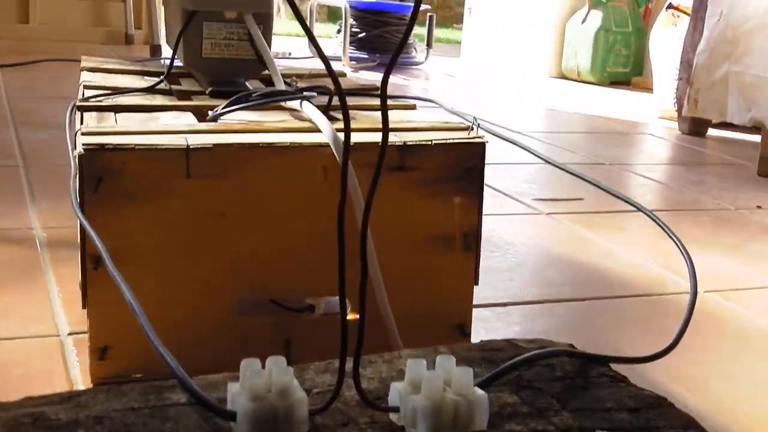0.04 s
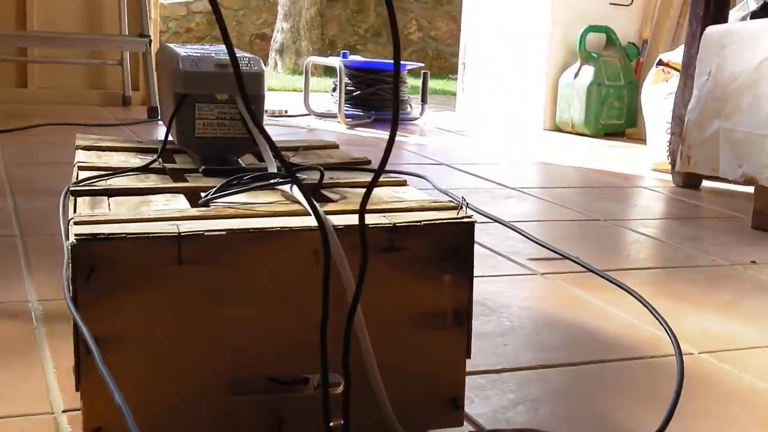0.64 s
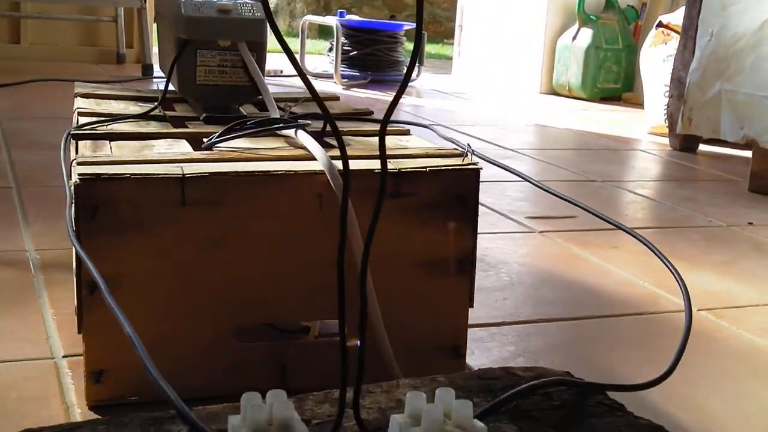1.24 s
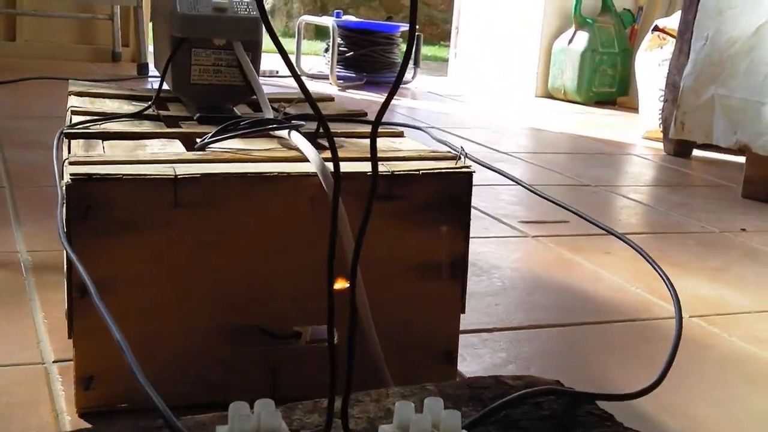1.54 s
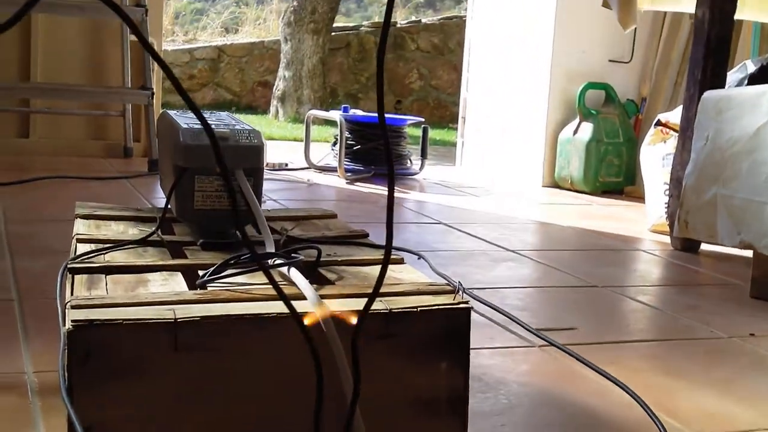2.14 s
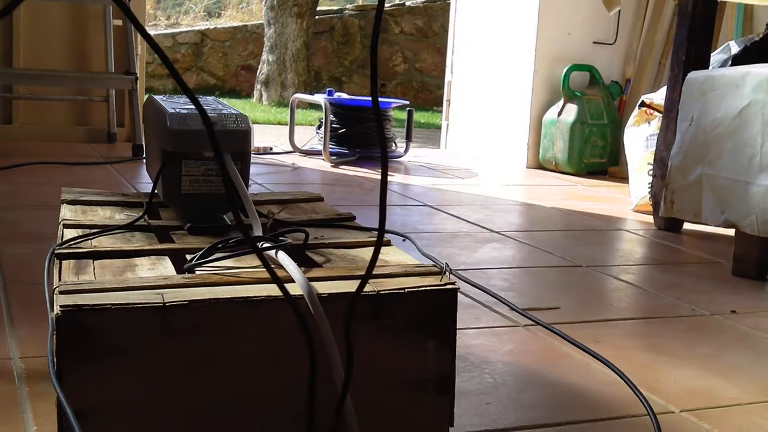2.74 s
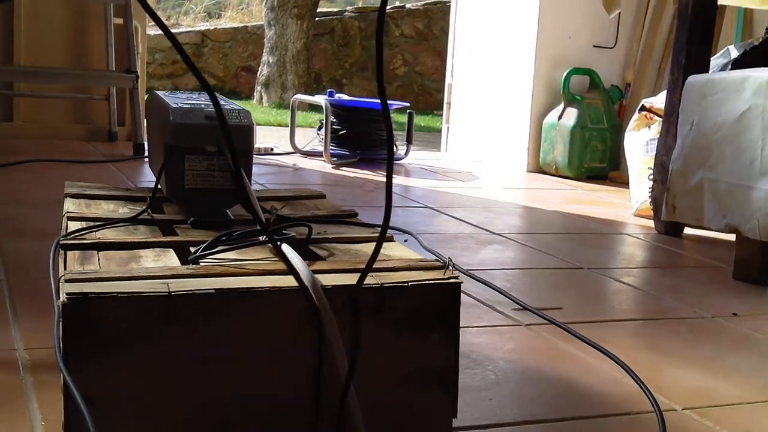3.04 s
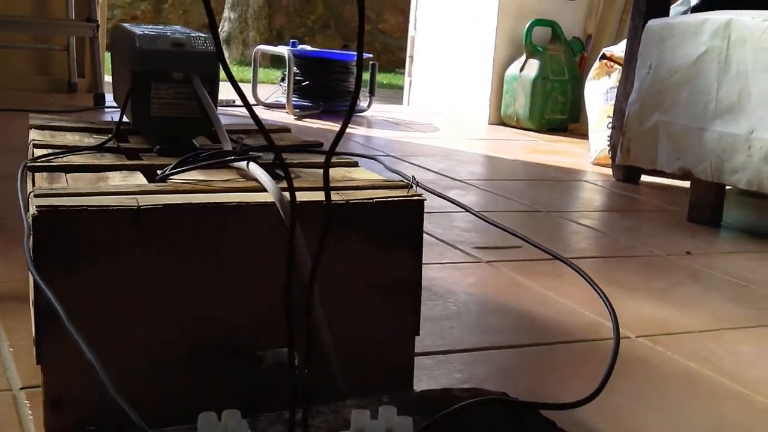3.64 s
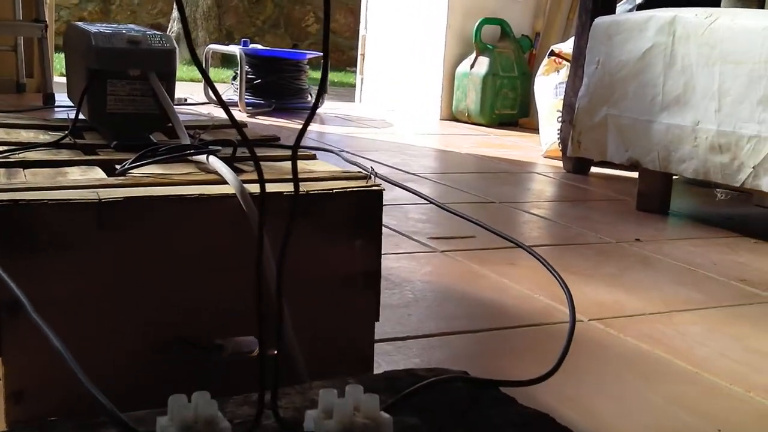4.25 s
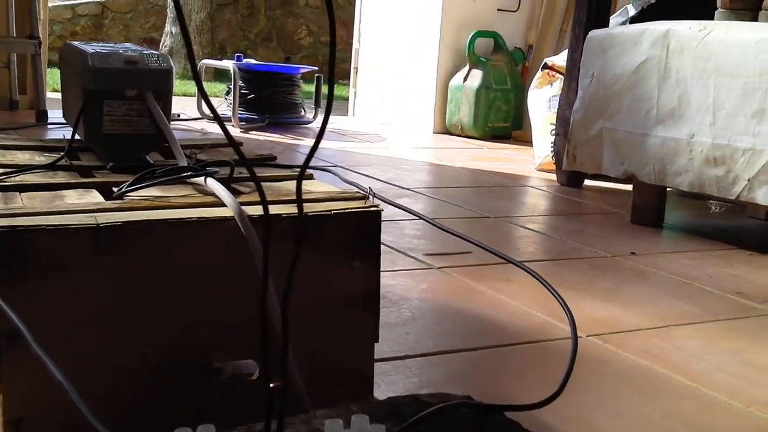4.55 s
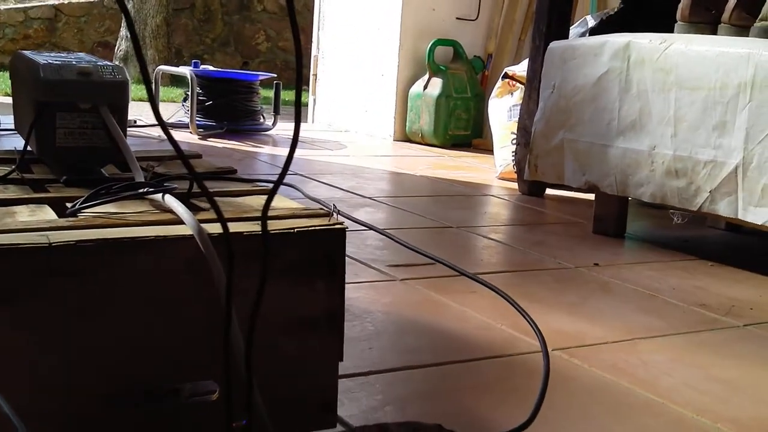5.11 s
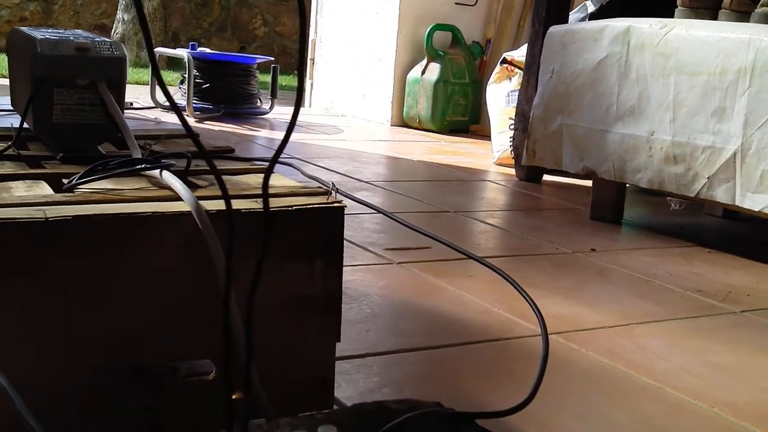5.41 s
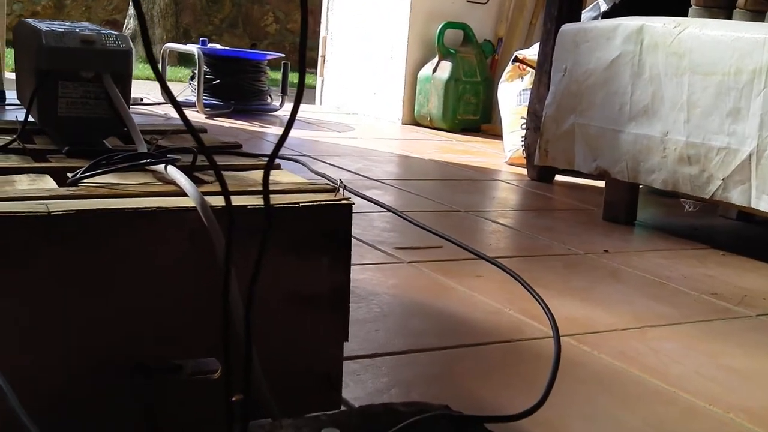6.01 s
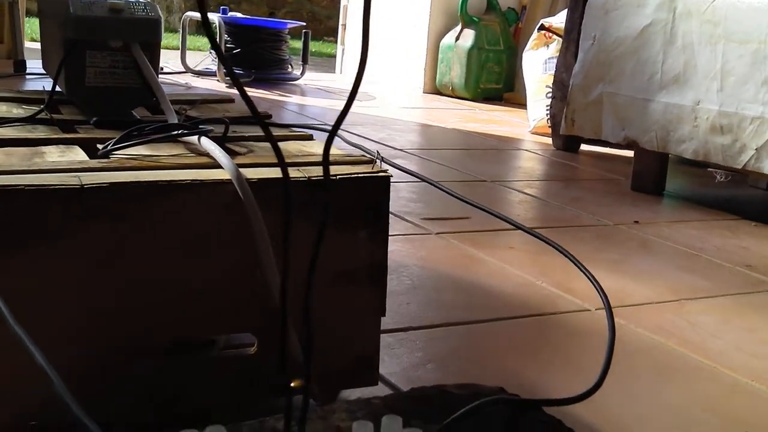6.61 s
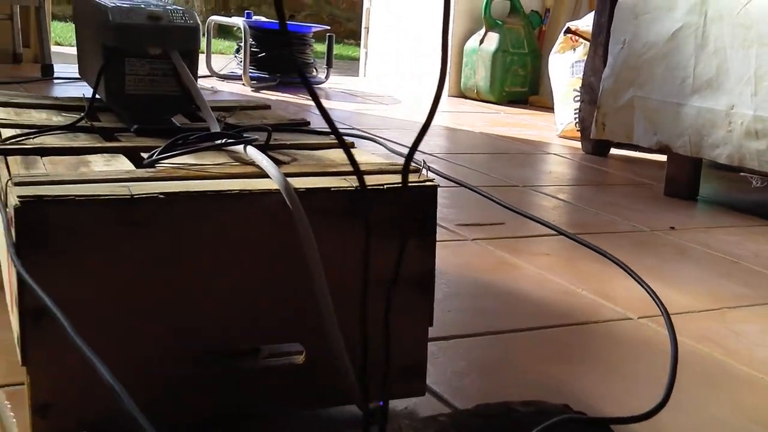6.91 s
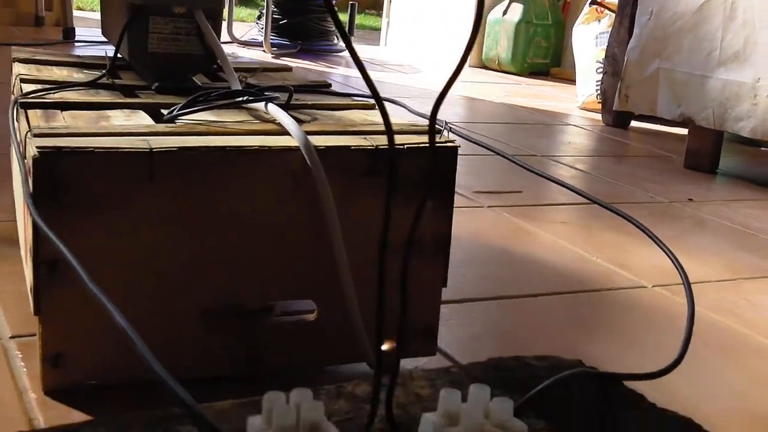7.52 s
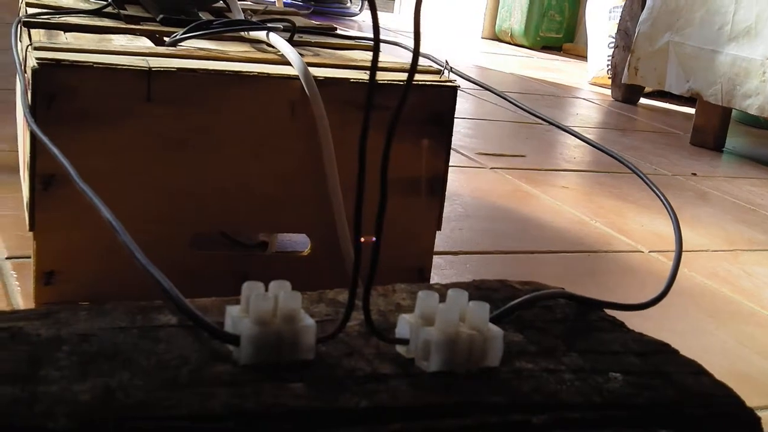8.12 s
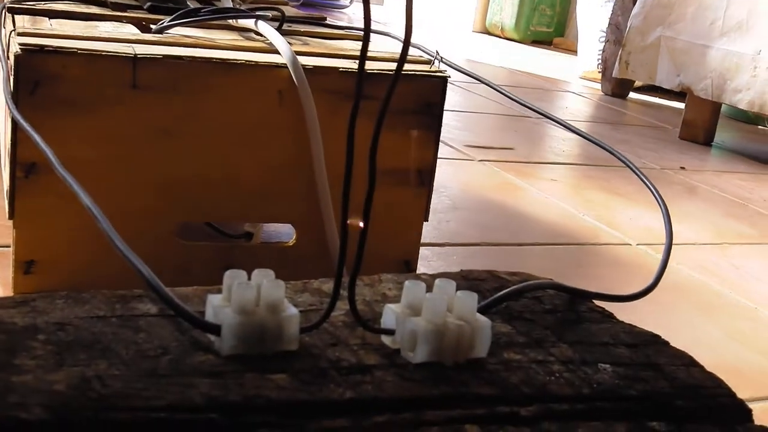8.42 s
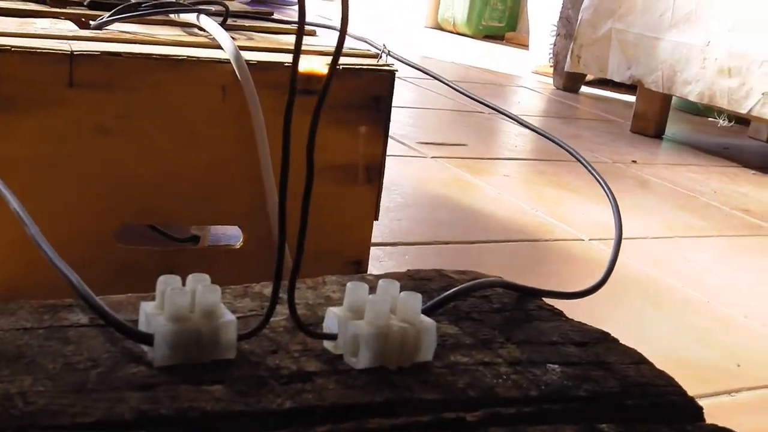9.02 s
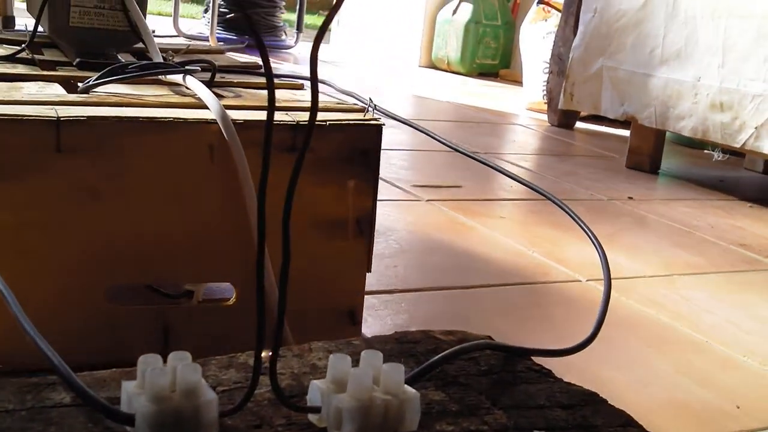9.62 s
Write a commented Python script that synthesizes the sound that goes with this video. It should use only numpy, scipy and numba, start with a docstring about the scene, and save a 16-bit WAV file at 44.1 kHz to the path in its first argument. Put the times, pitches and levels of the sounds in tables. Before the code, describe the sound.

Close electric buzzing and crackling in a room, growing louder and deeper twice as an arc rises along wires and cuts out.

```python
"""A climbing arc between two diverging wires, fed by a mains transformer in a tiled room.
First a short spark buzzes and spits in the narrow gap, striking with a snap in every mains half cycle.
At 1.3 s it lifts off, sizzles and grows louder and deeper as it stretches; at 2.5 s it breaks.
The buzz starts again below, with three soft bumps between 3.5 and 7 s.
From 8.4 to 9.5 s a second arc climbs and breaks, and the spark returns to the gap."""
import sys
import numpy as np
from scipy import signal
from scipy.fft import rfft, irfft
from scipy.io import wavfile
from scipy.ndimage import map_coordinates
from numba import njit

SR = 44100
rng = np.random.default_rng(int(sys.argv[2]) if len(sys.argv) > 2 else 0)


def generate_wav(signal):
    """Clip the signal to [-1, 1] and save it as 16-bit WAV at the path in sys.argv[1]."""
    frames = np.transpose(np.atleast_2d(signal))
    scaled = np.clip(frames, -1, 1) * 32767
    pcm = np.round(scaled).astype(np.int16)
    wavfile.write(sys.argv[1], SR, pcm)


N = 434826
TIME_S = np.arange(N) / SR
MAINS_HZ = 50

# Spectra. Each row: frequency in Hz, relative level in dB.
AMBIENCE_SPECTRUM = [(20, -16), (60, -13.5), (125, -26), (165, -19.5), (200, -15), (300, -9.5), (400, -0.5),
                     (520, -9), (800, -9), (1700, -19), (4000, -6), (9000, -22.5), (15500, -9)]
ROOM_MID_SPECTRUM = [(100, -14), (400, -8), (800, -3.5), (1800, -3.5), (4000, -2.5), (8000, -10),
                     (15500, -5)]  # reflections alike in both ears
ROOM_SIDE_SPECTRUM = [(100, -1), (400, -23), (1200, -13), (2500, -19), (4000, -4.5), (8000, -6),
                      (15500, -4)]  # reflections opposed in the two ears
SPIT_SPECTRUM = [(800, -5.5), (2200, -7), (4300, 2), (5500, 7), (7200, 16.5), (9500, 12), (12000, -3),
                 (15500, 4)]
POP_SPECTRUM = [(150, -24), (400, -1.5), (800, 3), (1300, -1.5), (2000, 0), (3500, 0.5), (8000, -28)]
SIZZLE_SPECTRUM = [(40, -16), (130, -21), (300, -6), (600, 1.5), (1300, -0.5), (1900, 0), (2800, -2),
                   (3600, -.5), (4600, 1.5), (6000, -4.5), (7300, 4.5), (9500, -1), (12000, -7.5),
                   (15500, -17)]
SHORT_THUMP_SPECTRUM = [(60, -48), (150, -32), (200, -13.5), (250, -3), (420, 2), (500, -3.5), (610, 3),
                        (720, -2.5), (950, -3.5), (1050, -8.5), (1150, -6.5), (1350, -5.5), (1500, -18),
                        (2200, -23.5)]
LONG_THUMP_SPECTRUM = [(40, -22), (120, -26.5), (200, -14), (300, -4.5), (400, 1), (500, -0.5), (600, 1.5),
                       (700, -5), (800, -2), (1150, -15), (2200, -19.5)]
SHORT_SNAP_SPECTRUM = [(200, -27), (900, -37), (1350, -9.5), (1800, -11), (2400, -8.5), (3200, -7),
                       (3750, -4), (4400, -14), (5700, -6), (7200, 2.5), (9300, 5.5), (11500, -5.5),
                       (13000, -0.5), (15500, -2.5)]
LONG_SNAP_SPECTRUM = [(900, -56), (1800, -11), (3500, -7), (4600, 1.5), (7000, 3), (9300, 7), (11000, 3.5),
                      (13000, 2.5), (15500, -6)]
BREAKING_SNAP_SPECTRUM = [(900, -27), (1800, -8.5), (3500, -19), (5000, -6), (7200, 2.5), (9500, 7.5),
                          (11000, 1), (13000, -4), (15500, -16)]

# Ringing modes. Each row: frequency in Hz, relative level in dB, T60 in seconds.
ROOM_RESONANCES = [(401, -8.5, 0.74), (456, 5.5, 0.21), (501.6, -1, 1.0), (600, -2.5, 0.53)]
BUMP_RESONANCES = [(163, -12, 0.04), (254, -5, 0.047), (350, 1.5, 0.034), (458, 0.5, 0.031)]
WIRE_RESONANCES = [(3700, -67, 0.046), (3840, -70, 0.057), (4200, -62.5, 0.067)]
# Microphone dips. Each row: frequency in Hz, width in Hz, depth from 0 to 1.
MIC_NOTCHES = [(7865, 690, 1), (11700, 97, 1)]
# Echo off the base under the wires, later as the arc rises. Each row: time in seconds, lag in ms.
BASE_LAG_MS = [(1.33, .152), (1.42, .179), (1.56, .218), (1.63, .252), (1.77, .346), (1.84, .383),
               (1.98, .42), (2.26, .471), (2.46, .49), (8.42, .145), (8.5, .15), (8.66, .201), (8.9, .238),
               (9.06, .266), (9.14, .298), (9.38, .368), (9.49, .38)]
# Floor echo, shifting as the microphone moves. Each row: time in seconds, lag after the base echo in ms.
FLOOR_LAG_MS = [(0, 0.62), (1.55, 0.65), (1.85, 0.73), (2.3, 0.69), (3.8, 0.53), (6, 0.67), (7.3, 0.676),
                (8.3, 0.64), (9.4, 0.71)]

# Soft bumps. Each row: start in seconds, relative level in dB.
BUMP_EVENTS = [(3.452, -26), (6.325, -37), (7.044, -24)]
# Spits at the arc's feet. Each row: peak time in seconds, relative crackle and pop levels in dB.
SPIT_EVENTS = [(0.0794, -20, -31), (0.0977, -21, -36), (0.1158, -23, -36), (0.179, -27, -36),
               (0.1892, -21, -40), (0.1965, -19.5, -32), (0.4253, -29, -38), (1.1472, -25, -52),
               (1.168, -21, -39), (1.2388, -21, -47), (1.285, -25, -37), (1.2983, -23, -33),
               (1.3394, -20, -45), (1.58, -22, -32), (1.656, -22, -26.5), (1.739, -28, -24),
               (1.787, -24, -23.5), (1.836, -29, -23), (1.8968, -32, -19.5), (2.088, -11, -25),
               (2.392, -26, -28), (2.9078, -30, -33), (2.9375, -30, -35), (2.9379, -24, -33),
               (2.966, -25, -36), (3.2361, -34, -37), (5.719, -27, -42), (5.7296, -24, -28.5),
               (6.9673, -32, -45), (7.0874, -27, -43), (8.0066, -29, -36.5), (8.207, -24, -39),
               (8.4506, -25, -32), (8.469, -24, -38), (8.4989, -15, -49), (8.5101, -16.5, -36),
               (8.62, -20, -29), (8.6574, -20, -30), (8.6777, -16, -32), (8.681, -13.5, -25.5),
               (8.739, -21, -28), (8.7483, -27, -25), (8.757, -22, -28.5), (8.79, -22, -27.5),
               (8.85, -25, -22), (8.879, -19, -24), (8.999, -17.5, -25.5), (9.257, -36, -22),
               (9.28, -41, -20), (9.301, -33, -22), (9.438, -19, -21), (9.8293, -25, -30),
               (9.841, -27.5, -33)]
# Strikes that stand out. Each row: time in seconds, relative level in dB, loss per next strike in dB.
CRACK_EVENTS = [(1.803, -24, 5), (1.833, -28.5, 0), (1.863, -25, 8), (1.903, -23, 4), (2.203, -21, 1.5),
                (2.233, -24.5, 14), (2.283, -25, 16), (2.303, -21, 0.5), (2.443, -19, 9), (7.724, -39, 12),
                (8.424, -34.5, 12), (8.724, -31.5, 14), (9.094, -27.5, 11), (9.134, -25, 12),
                (9.154, -24.5, 3), (9.194, -26, 4), (9.234, -25.5, 4), (9.284, -27, 18), (9.304, -33, 16),
                (9.324, -26, 14), (9.364, -24, 10), (9.384, -28.5, 11), (9.404, -25, 12), (9.434, -22, 4),
                (9.474, -21.5, 7)]
# Mains drift. Each row: time in seconds, mean strike lag into the half cycle in ms.
STRIKE_LAG_MS = [(0, 2.48), (3, 3.48), (4.5, 4.02), (6, 4.29), (9.85, 4.7)]
# Colour of the buzz. Each row: time in seconds, gain around 900 Hz in dB.
BUZZ_MID_DB = [(0, 0), (1, 0.5), (2.8, 0.5), (3.4, 2), (4.1, 0), (5.1, 1), (6, 1.5), (6.6, 1.5), (7.3, 2),
               (8.3, 1.5), (9.8, 1)]
# Short spark in the gap. Each row: time in seconds, relative snap, thump and sizzle levels in dB,
# snap gain around 6 kHz in dB, snap gain above 12 kHz in dB.
GAP_LEVELS_DB = [(0, -39.5, -49.5, -40.5, -5.5, -1.5), (.6, -44.5, -49.5, -48, 0.5, 4),
                 (1.25, -40.5, -49, -41.5, -3, 2), (2.65, -44.5, -51.5, -44, -7, -5),
                 (3.2, -43, -51.5, -43, -0.5, 4), (3.9, -40.5, -51, -46, -12, -0.5),
                 (5.8, -44.5, -50.5, -44.5, -2, 4), (6.85, -44, -49.5, -44, 1, 5.5),
                 (7.03, -46, -49.5, -43, 1.5, 5), (7.11, -49.5, -49, -41, 9.5, 11),
                 (7.17, -45, -49, -50, 0.5, 5), (7.35, -44.5, -49, -45.5, 0.5, 5),
                 (8.4, -40, -48.5, -42.5, -3.5, 4.5), (9.6, -41.5, -49, -38.5, -22, -8)]
# Climbs. Each row: lift-off in seconds, break in seconds, snap offset in dB, thump offset in dB.
CLIMB_EVENTS = [(1.264, 2.451, -1, -0.5), (8.436, 9.493, 0.5, -1.5)]
# Course of every climb. Each row: progress from 0 to 1, relative snap and thump levels in dB.
CLIMB_LEVELS_DB = [(.05, -38, -47), (.24, -35.5, -45), (.31, -32.5, -43.5), (.6, -29.5, -40),
                   (.76, -24, -33.5), (.88, -29.5, -30.5), (1, -24.5, -26.5)]
# Sizzle of the climbs. Each row: time in seconds, relative level in dB, band centre in Hz.
SIZZLE_TRACK = [(1.29, -29, 6400), (1.36, -30, 6100), (1.43, -29, 5640), (1.54, -35, 5250),
                (1.63, -24, 4740), (1.72, -26, 4020), (1.82, -29.5, 3400), (1.91, -27, 3200),
                (2.0, -23.5, 4600), (2.09, -28, 4600), (2.22, -27.5, 2500), (2.29, -38, 1990),
                (2.45, -39, 1800), (8.46, -47, 6600), (8.5, -30.5, 6400), (8.54, -29, 5900),
                (8.61, -27, 5400), (8.645, -31.5, 5000), (8.715, -34, 4600), (8.75, -25.5, 4400),
                (8.83, -26.5, 4200), (9.02, -26.5, 4000), (9.12, -23, 3600), (9.2, -26, 2700),
                (9.28, -30.5, 1900), (9.35, -33.5, 1700), (9.49, -30, 1700)]


def from_db(db):
    """Decibels to gain."""
    return 10 ** (np.asarray(db) / 20)


def unit_rms(x):
    """Scale to an rms of 1."""
    return x / np.sqrt(np.mean(x ** 2) + 1e-20)


def curve(rows, at):
    """Interpolate a table's columns along its first."""
    knots, *columns = np.transpose(rows)
    return [np.interp(at, knots, column) for column in columns]


def response(spectrum, size=4096):
    """Minimum-phase impulse response of a spectrum."""
    hz, db = np.transpose(spectrum)
    grid_hz = np.maximum(np.fft.rfftfreq(size, 1 / SR), 1)
    gain = from_db(np.interp(np.log(grid_hz), np.log(hz), db))
    cepstrum = irfft(np.log(gain))
    cepstrum[1:size // 2] *= 2
    cepstrum[size // 2 + 1:] = 0
    return irfft(np.exp(rfft(cepstrum)))


def colour(x, spectrum):
    """Filter by a spectrum, keeping the power of a white input."""
    impulse = response(spectrum)
    return signal.oaconvolve(x, impulse / np.linalg.norm(impulse))[:N]


def butter(x, hz, kind="low", order=1):
    """Butterworth filter."""
    return signal.sosfilt(signal.butter(order, hz, kind, fs=SR, output="sos"), x)


@njit
def gliding_band(x, centre_hz, damping=1.0):
    """Unity-gain resonance with a moving centre."""
    out, band_state, low_state = np.zeros(len(x)), 0.0, 0.0
    for i in range(len(x)):
        g = np.tan(np.pi * centre_hz[i] / SR)
        band = (band_state + g * (x[i] - low_state)) / (1 + g * (g + damping))
        band_state = 2 * band - band_state
        low_state += 2 * g * band
        out[i] = damping * band
    return out


def delayed(x, delay_ms):
    """Time-varying delay."""
    return map_coordinates(x, [np.arange(N) - delay_ms * SR / 1000], order=3)


def clicks(times_s, sizes):
    """One impulse at each time."""
    samples = np.clip(np.round(times_s * SR).astype(int), 0, N)
    return np.bincount(samples, sizes, N + 1)[:N]


def capped_normal(count, cap=1):
    """Gaussian draws, limited from above."""
    return np.minimum(rng.standard_normal(count), cap)


def climb_at(times_s, lift_s=0.034):
    """Progress of the climb and how fully the arc has left the gap, both 0-1."""
    progress = lifted = 0
    for start_s, end_s, *_ in CLIMB_EVENTS:
        unbroken = times_s < end_s
        progress += unbroken * np.clip((times_s - start_s) / (end_s - start_s), 0, 1)
        lifted += unbroken * np.clip((times_s - start_s) / lift_s, 0, 1)
    return progress, lifted


def height_at(times_s, rest=0.06, jump=0.15):
    """Arc height, 0-1: a jump at lift-off, then an accelerating rise."""
    progress, lifted = climb_at(times_s)
    return np.clip(rest + jump * lifted + (1 - rest - jump) * progress ** 1.3, 0, 1)


def levels_db_at(times_s):
    """Snap, thump and sizzle levels, blended from gap to climb."""
    progress, lifted = climb_at(times_s)
    snap_db, thump_db = curve(CLIMB_LEVELS_DB, progress)
    for start_s, end_s, snap_offset_db, thump_offset_db in CLIMB_EVENTS:
        during = (times_s > start_s) & (times_s < end_s)
        snap_db += during * snap_offset_db
        thump_db += during * thump_offset_db
    climb_db = snap_db, thump_db, curve(SIZZLE_TRACK, times_s)[0]
    return [gap + lifted * (climb - gap) for gap, climb in zip(curve(GAP_LEVELS_DB, times_s), climb_db)]


def ambience(level_db=-48.5, side_db=-5.0, rumble_db=-82.0):
    """Steady rush of the room, with a faint separate rumble in each ear."""
    mid, side = (colour(rng.standard_normal(N), AMBIENCE_SPECTRUM) for _ in range(2))
    rush = mid + from_db(side_db) * np.array([side, -side])
    rumble = unit_rms(butter(rng.standard_normal((2, N)), 90, order=2))
    return from_db(level_db) * rush + from_db(rumble_db) * rumble


def reflections(x, spectrum, early_share, t60_s, early_decay_s=0.0022, first_s=0.00034):
    """Close reflections from crate and floor, then the diffuse tail, at one spot."""
    t = TIME_S[:SR // 2]
    early, tail = rng.standard_normal((2, len(t)))
    early *= np.exp(-t / early_decay_s) * (t > first_s)
    tail *= from_db(-60 * t / t60_s) * (t > .004)
    early *= np.sqrt(early_share) / np.linalg.norm(early)
    tail *= np.sqrt(1 - early_share) / np.linalg.norm(tail)
    return signal.oaconvolve(x, signal.fftconvolve(early + tail, response(spectrum)))[:N]


def room(x, mid_early_share, side_early_share, t60_s, sway_s=7.0):
    """The hand-held microphone sways, so one reflection pattern gives way to another."""
    angle = 2 * np.pi * TIME_S / sway_s
    weights = np.cos(angle), np.sin(angle)
    mid = sum(w * reflections(x, ROOM_MID_SPECTRUM, mid_early_share, t60_s) for w in weights)
    side = sum(w * reflections(x, ROOM_SIDE_SPECTRUM, side_early_share, t60_s) for w in weights)
    return mid + np.array([side, -side])


def echoes(x, strikes_s, gap_lag_ms=0.15, gap_gain=0.28, lift_gain=0.6, top_gain=0.26, floor_gain=0.2):
    """Base and floor echoes lag as the arc climbs, sweeping the colour down. Returns sum, base path."""
    progress, lifted = climb_at(TIME_S)
    # each channel takes a new path
    flutter_ms = 0.0099 * np.interp(TIME_S, strikes_s, rng.standard_normal(len(strikes_s)))
    lag_ms = gap_lag_ms + lifted * (curve(BASE_LAG_MS, TIME_S)[0] - gap_lag_ms)
    base = delayed(x, lag_ms + flutter_ms)
    base_gain = gap_gain + lifted * (lift_gain + (top_gain - lift_gain) * progress - gap_gain)
    floor = floor_gain * delayed(base, curve(FLOOR_LAG_MS, TIME_S)[0])
    return (x + base_gain * base + floor) / np.sqrt(1 + base_gain ** 2), base


def bumps(gain_db=-7.5):
    """Dull knocks that ring for a few cycles."""
    starts_s, levels_db = np.transpose(BUMP_EVENTS)
    t = TIME_S[:SR // 4]
    ring = sum((-1) ** k * from_db(db - 60 * t / t60_s) * np.sin(2 * np.pi * hz * t)
               for k, (hz, db, t60_s) in enumerate(BUMP_RESONANCES))
    return signal.oaconvolve(clicks(starts_s, from_db(levels_db + gain_db)), ring)[:N]


def wires(strikes_s):
    """Each strike in the gap rings the wires faintly."""
    t = TIME_S[:SR // 8]
    ring = sum(from_db(db - 60 * t / t60_s) * np.sin(2 * np.pi * hz * t)
               for hz, db, t60_s in WIRE_RESONANCES)
    in_gap = 1 - climb_at(strikes_s)[1]
    return signal.oaconvolve(clicks(strikes_s, in_gap), ring)[:N]


def spits(crackle_gain_db=-1.5, pop_gain_db=17.0, swell_s=0.00058, straggle_s=0.005, scatter_s=0.0004,
          faint_count=100, pops_per_spit=4):
    """An arc foot jumps along the wire: small pops in a swell of crackle. Faint spits fall at random."""
    position, size = rng.random((faint_count, 2)).T
    extra_db = 10.5 * size ** 2
    faint = np.column_stack([position * N / SR, -38 + extra_db, -52.5 + extra_db])
    peaks_s, crackle_db, pop_db = np.vstack([faint, SPIT_EVENTS]).T
    grains = unit_rms(rng.standard_normal(N) * from_db(4 * capped_normal(N, 2)))
    t = np.arange(-(SR // 50), SR // 50 + 1) / SR
    swell = np.exp(-.5 * (t / swell_s) ** 2) + from_db(-21.5) * np.exp(-abs(t) / straggle_s)
    envelope = signal.oaconvolve(clicks(peaks_s, from_db(crackle_db + crackle_gain_db)), swell, "same")
    offsets, signs = rng.standard_normal((len(peaks_s), pops_per_spit, 2)).T
    pops = sum(clicks(peaks_s + scatter_s * offset, np.sign(sign) * from_db(pop_db + pop_gain_db))
               for offset, sign in zip(offsets, signs))
    return colour(envelope * grains, SPIT_SPECTRUM) + colour(pops / np.sqrt(pops_per_spit), POP_SPECTRUM)


def sizzle(strikes_s, gain_db=-3.5, grains_per_s=7000, grain_db=4.0, burst_db=2.5, clump_db=3.5,
           ripple=0.023, low_cut_db=-19.5):
    """The arc's feet crackle over the wire while current flows, more in some half cycles than others."""
    grains = (rng.random(N) < grains_per_s / SR) * rng.choice([-1, 1], N)
    grains = grains * from_db(grain_db * np.minimum(rng.exponential(1, N), 5))
    half_cycles = np.interp(TIME_S, strikes_s, np.arange(len(strikes_s)))
    current = 1 - ripple + ripple * np.sqrt(2) * abs(np.sin(np.pi * half_cycles))
    unrest = np.minimum(.5 + 2 * height_at(strikes_s), 1)
    bursts = from_db(burst_db * unrest * capped_normal(len(strikes_s)))[half_cycles.astype(int)]
    knots_s = TIME_S[::SR // 600]
    clumping = np.interp(TIME_S, knots_s, capped_normal(len(knots_s), 2))
    clumps = from_db(clump_db * climb_at(TIME_S)[1] * clumping)
    crackle = unit_rms(grains * current * bursts * clumps) * from_db(levels_db_at(TIME_S)[2] + gain_db)
    crackle = colour(crackle, SIZZLE_SPECTRUM)
    # a short channel radiates lows poorly
    shortness = np.clip(1 - height_at(TIME_S) / 0.42, 0, 1)
    return crackle + (from_db(low_cut_db * shortness) - 1) * butter(crackle, 3500)


def whoosh(x, emphasis_db=2.5):
    """A climbing arc's sizzle gathers in a broad band that sinks as the channel stretches."""
    boost = (from_db(emphasis_db) - 1) * climb_at(TIME_S)[1]
    centre_hz = curve(SIZZLE_TRACK, TIME_S)[1]
    return (x + boost * gliding_band(x, centre_hz)) / np.sqrt(1 + boost)


def buzz_colour(x):
    """The buzz turns more nasal or rounder as the microphone moves."""
    mid_db, = curve(BUZZ_MID_DB, TIME_S)
    for band_hz, db in (([760, 1080], mid_db), ([280, 340], -1.2 * mid_db)):
        x = x + (from_db(db) - 1) * butter(x, band_hz, "band")
    return x


def thumps(strikes_s, long_db=-4.0):
    """Heated air expands at each strike: the body of the buzz. A long arc rings the room's modes."""
    long = np.minimum(2 * height_at(strikes_s), 1)
    roughness = 0.064 + 0.27 * long
    size = from_db(levels_db_at(strikes_s)[1]) * np.sqrt(SR / (2 * MAINS_HZ))
    size *= 1 + roughness * rng.standard_normal(len(strikes_s))
    buzz = buzz_colour(colour(clicks(strikes_s, size * (1 - long)), SHORT_THUMP_SPECTRUM))
    growl = colour(clicks(strikes_s, size * long), LONG_THUMP_SPECTRUM)
    ring = np.zeros(N)
    for hz, db, t60_s in ROOM_RESONANCES:
        q = np.pi * hz * t60_s / np.log(1000)
        ring += from_db(db) * signal.lfilter(*signal.iirpeak(hz, q, fs=SR), growl + 1e-18)
    return buzz + from_db(long_db) * (growl + ring)


def spark_colour(x, strikes_s, lift_air_db=5.0, break_air_db=-6.5, flicker_db=3.5):
    """Two treble bands vary as the spark wanders and flicker per strike; a climbing arc loses its top."""
    progress, lifted = climb_at(TIME_S)
    sharp_db, air_db = (1 - lifted) * np.array(curve(GAP_LEVELS_DB, TIME_S)[3:])
    air_db += lifted * (lift_air_db + (break_air_db - lift_air_db) * progress)
    for band_hz, db in (([4800, 7200], sharp_db), ([11800, 17000], air_db)):
        flicker = np.interp(TIME_S, strikes_s, capped_normal(len(strikes_s)))
        x = x + (from_db(db + flicker_db * flicker) - 1) * butter(x, band_hz, "band")
    return x


def strikes(polarity_lag_ms=0.54, stretch_lead_ms=1.0, short_jitter_ms=0.013, long_jitter_ms=0.3):
    """One strike per half cycle. A short gap favours one polarity; a long arc is early and unsteady."""
    half_cycle = np.arange(int(N / SR * 2 * MAINS_HZ))
    starts_s, polarity = half_cycle / (2 * MAINS_HZ), half_cycle % 2
    progress = climb_at(starts_s)[0]
    skew_ms = polarity_lag_ms * (polarity - .5) * np.clip(1 - progress / .45, 0, 1)
    lag_ms = curve(STRIKE_LAG_MS, starts_s)[0] + skew_ms - stretch_lead_ms * progress ** 4
    jitter_ms = short_jitter_ms + long_jitter_ms * height_at(starts_s) ** 2
    lag_ms += jitter_ms * rng.standard_normal(len(starts_s))
    return starts_s + lag_ms / 1000, polarity


def snaps(strikes_s, polarity, gain_db=3.0, falter_chance=0.1, falter_db=-8, lopsided_db=-5.0,
          keen_chance=0.62, keen_share=0.16, long_height=0.33, dull_height=0.79):
    """Each breakdown is a sharp click, mostly duller in a longer channel."""
    height, lifted = height_at(strikes_s), climb_at(strikes_s)[1]
    spread_db = 2.0 - 0.4 * height
    level_db = levels_db_at(strikes_s)[0] + spread_db * capped_normal(len(strikes_s))
    falters, keen = rng.random((2, len(strikes_s))) < [[falter_chance], [keen_chance]]
    # a climbing channel still hot relights softly: at random and before each crack
    crack_starts = np.array([np.argmin(abs(strikes_s - time_s)) for time_s, *_ in CRACK_EVENTS])
    falters[crack_starts - 1] = True
    soft_db = falter_db * falters * lifted * np.minimum(2 * height, 1) ** 2
    # near the break, one polarity strikes more weakly
    breaking = np.clip((height - dull_height) / (1 - dull_height), 0, 1)
    level_db += np.minimum(soft_db, lopsided_db * polarity * breaking)
    for first, (_, crack_db, loss_db) in zip(crack_starts, CRACK_EVENTS):
        run = np.arange(4)
        run = run[(run < 2) | (lifted[first + run] > 0)]  # only a climbing arc sustains more than a pair
        level_db[first + run] = np.maximum(level_db[first + run], crack_db - loss_db * run)
    size = from_db(level_db + gain_db) * np.sqrt(SR / (2 * MAINS_HZ))
    # keen strikes keep part of the short spark's spectrum
    long = np.clip(height / long_height, 0, 1) * (1 - keen_share * keen)
    blend = [(1 - long, SHORT_SNAP_SPECTRUM),
             (long * (1 - breaking), LONG_SNAP_SPECTRUM),
             (long * breaking, BREAKING_SNAP_SPECTRUM)]
    return -sum(colour(clicks(strikes_s, size * share), spectrum) for share, spectrum in blend)


def scene(low_wet_db=-1.5, sizzle_echo_share=0.74):
    """The arc close by in the room. Sizzle, spread along the channel, echoes less clearly than snaps."""
    strikes_s, polarity = strikes()
    hiss = whoosh(sizzle(strikes_s))
    spark = spark_colour(snaps(strikes_s, polarity), strikes_s)
    arc, base_path = echoes(spark + sizzle_echo_share * hiss, strikes_s)
    loose_crackle = spits() + (1 - sizzle_echo_share) * hiss
    low = thumps(strikes_s) + bumps()
    bright_room = room(base_path + loose_crackle, mid_early_share=0.44, side_early_share=0.66, t60_s=0.34)
    low_room = from_db(low_wet_db) * room(low, mid_early_share=0.036, side_early_share=0.46, t60_s=0.36)
    return arc + loose_crackle + low + bright_room + low_room + wires(strikes_s) + ambience()


def record(dry, ceiling=11.0, dc_offset=-0.0027, cutoff_hz=15950):
    """Microphone: two narrow dips, rounded peaks, a small offset, a steep treble cut."""
    for hz, width_hz, depth in MIC_NOTCHES:
        dry = dry - depth * signal.lfilter(*signal.iirpeak(hz, hz / width_hz, fs=SR), dry)
    rounded = ceiling * np.tanh(dry / ceiling) + dc_offset
    return signal.sosfilt(signal.ellip(10, .2, 80, cutoff_hz, fs=SR, output="sos"), rounded)


dry = scene()
out = record(dry)
generate_wav(out)
```